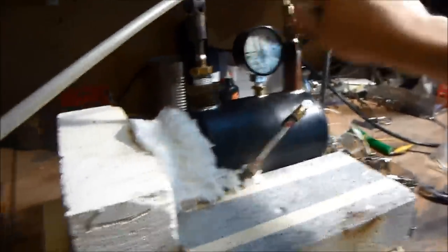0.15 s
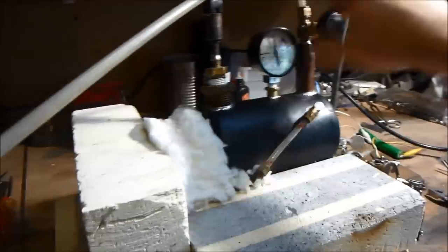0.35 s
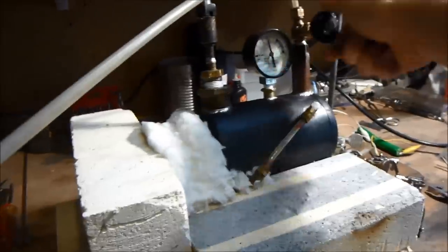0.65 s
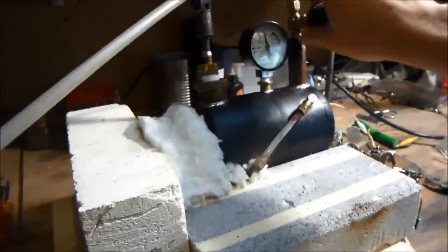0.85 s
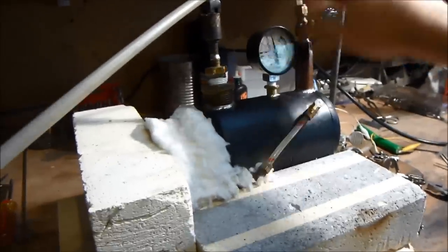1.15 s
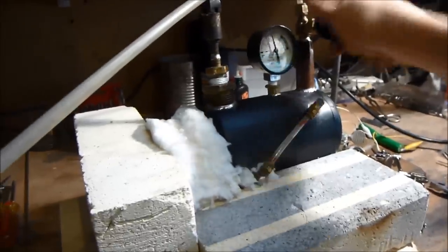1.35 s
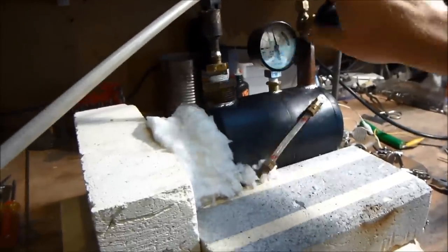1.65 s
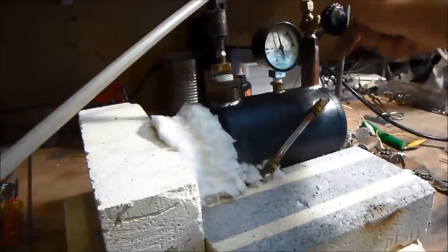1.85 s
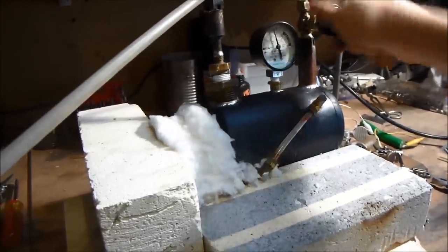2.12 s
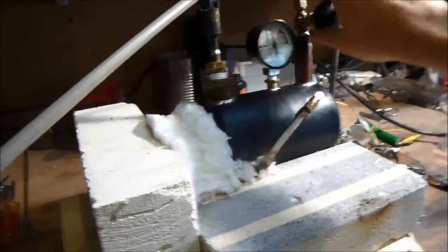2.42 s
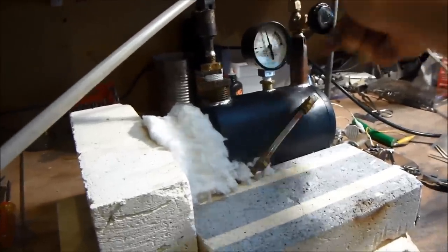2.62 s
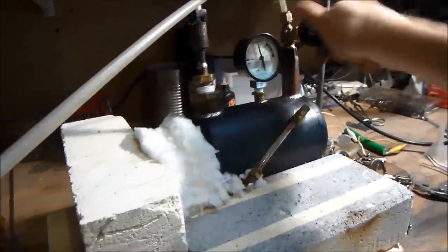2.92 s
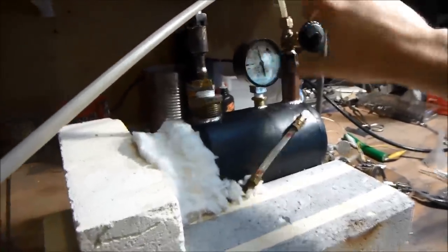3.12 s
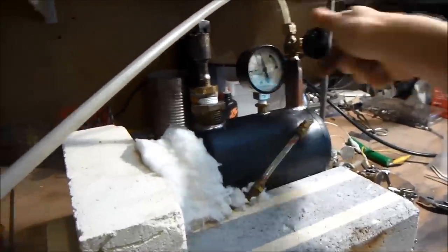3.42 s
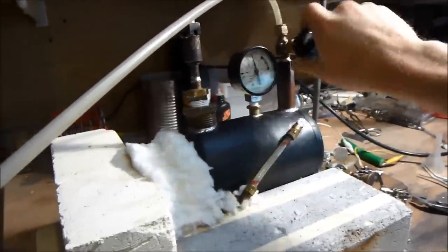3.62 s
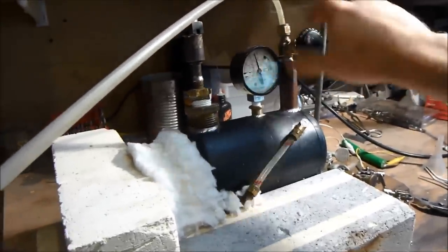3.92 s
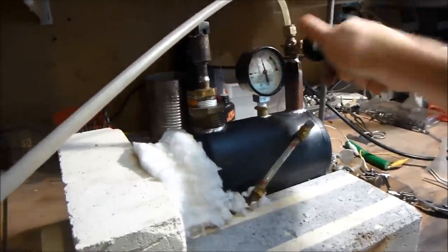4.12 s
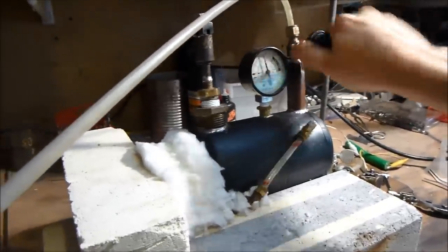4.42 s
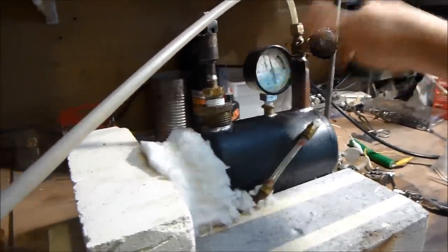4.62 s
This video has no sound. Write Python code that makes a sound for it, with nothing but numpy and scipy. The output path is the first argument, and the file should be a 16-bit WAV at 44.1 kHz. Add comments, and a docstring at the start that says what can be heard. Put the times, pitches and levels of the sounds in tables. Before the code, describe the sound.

Steam from a small boiler hisses through a hand valve and a narrow line, close by in a workshop, from the first moment to the end at nearly 5 seconds. The sound is a steady, slightly fluttering rush topped by a bright sizzle and a thin, very high whistle, with a soft low roar underneath. Now and then a faint ringing tone of the pipework rises out of the hiss, around 0.6, 1.7, 2.4, 3.7 and 4.2 seconds. The rush grows slightly and gradually as the valve is turned open. At about 3 seconds the sizzle shifts a little lower and the whistle sinks slightly; the sizzle briefly returns near 3.7 seconds, then settles lower from about 4 seconds, where the rush is fullest. The hiss sits a little to the left and drifts gently with the hand-held microphone.

```python
"""In a workshop, close by, steam from a small boiler hisses through a hand valve and a narrow line.
A rush rings the pipework, the valve seat sizzles brightly, and a soft low roar sits underneath.
As the valve is slowly turned open the rush grows, and the sizzle, with its thin top whistle,
moves to lower resonances. Each layer is a map of power over time and pitch; their sum shapes
one stereo noise, heard through a gently swaying microphone."""
import sys
import numpy as np
from scipy import signal
from scipy.io import wavfile
from scipy.ndimage import uniform_filter1d

SR = 44100
rng = np.random.default_rng(int(sys.argv[2]) if len(sys.argv) > 2 else 0)


def bounce(signal):
    """Save signal as a 16-bit WAV file at the path given by the first command-line argument."""
    frames = np.transpose(np.atleast_2d(signal))
    limited = np.clip(frames, -1, 1)
    pcm = np.round(limited * 32767).astype(np.int16)
    wavfile.write(sys.argv[1], SR, pcm)


N = 210029
FRAME, HOP = 2048, 256
HZ = np.fft.rfftfreq(FRAME, 1 / SR)
TIMES = np.arange(N // HOP + 3) * HOP / SR

# ride of the sizzle: t/s, level/dB
SIZZLE_LEVEL = [(0, -27.5), (.12, -27.5), (.25, -25.5), (.48, -24), (.6, -25.5), (1.1, -25.5), (1.25, -27),
                (1.5, -25.5), (1.8, -26), (2.45, -25), (2.65, -25), (3.05, -24.5), (3.28, -25), (3.5, -24),
                (3.65, -25.4), (4.76, -25.5)]
# hiss bed of the seat, gap narrow and gap wide: f/Hz, level/dB
SIZZLE_NARROW = [(8500, -33), (10200, -13), (11200, -8), (12000, 0.5), (12500, 2), (12850, -4),
                 (13400, -4.5), (14100, -2.5), (14600, -6), (15100, -16), (15400, -37.5)]
SIZZLE_WIDE = [(8500, -50), (10200, -9.5), (11200, -4), (12000, -7), (12500, -9), (12850, -1), (13400, -5),
               (14100, -6), (14600, -5), (15100, -14), (15600, -13.5)]
# seat resonances, gap narrow and gap wide: f/Hz, width/Hz, level/dB
SEAT_NARROW = [(10600, 169, -6.5), (10972, 61, -4.5), (11275, 35, 0), (11483, 76, 0.0), (11831, 150, 3.0),
               (12158, 40, 7.5), (12249, 77, 4), (12440, 70, 4), (12562, 90, 8.5), (13019, 40, 2),
               (13700, 130, 3.0), (13880, 190, 6), (14120, 60, 0)]
SEAT_WIDE = [(10364, 143, -6), (10713, 146, 1.5), (10974, 99, -2.5), (11194, 93, -.5), (11516, 190, 0),
             (11829, 127, 3), (12092, 133, 3.5), (12309, 74, -0.5), (12557, 101, -1), (13019, 43, 1.5),
             (13321, 65, 5.5), (13631, 103, 3), (13840, 150, 6)]
def sizzle(opening, surge_db):
    """Bright sizzle of the valve seat, crossfading from narrow gap to wide as the valve opens."""
    level_db = along(SIZZLE_LEVEL)[0] + 0.34 * surge_db  # follows the surges less than the pipework
    narrow = colour(SIZZLE_NARROW, SEAT_NARROW, ring_db=-3.5)
    wide = colour(SIZZLE_WIDE, SEAT_WIDE, ring_db=0.5)
    return gain_of(level_db) ** 2 * ((1 - opening) * narrow + opening * wide)


# slow build of the rush: t/s, level/dB
RUSH_LEVEL = [(0, -31), (.25, -29.6), (.65, -30.1), (1.02, -29.5), (1.22, -30), (1.45, -29.5), (1.75, -29),
              (2.2, -28.5), (2.55, -29), (3.05, -28), (3.65, -28.5), (3.85, -28.5), (4.2, -28),
              (4.76, -27.5)]
# turbulence bed in the line: f/Hz, level/dB
RUSH_BED = [(2600, -38), (3100, -11.5), (3600, -4), (4400, -3), (5100, -2), (6000, -3), (6900, -2),
            (7600, -5), (8500, -3), (9500, -4), (11000, -4.5), (14000, -38)]
# resonances of the line: f/Hz, width/Hz, level/dB
LINE_MODES = [(3146, 52, 3), (3343, 67, 5), (3498, 51, 4), (3610, 56, 3.5), (3740, 37, 8), (3897, 41, 5.5),
              (3950, 42, 7), (4020, 22, 8.5), (4180, 64, 4.5), (4280, 35, 2), (4577, 84, 6.5),
              (4755, 44, 5.5), (4844, 59, 6.5), (5130, 45, 2.5), (5270, 60, 0.5), (5490, 56, -3),
              (5650, 67, 1.5), (5830, 74, -3.5), (6170, 88, 0), (6597, 76, 2.5), (6750, 38, 4)]
def rush(tilt_db, surge_db):
    """Body of the hiss: steam rings the narrow line, and a faster jet leans to the treble."""
    brightness_db = tilt_db * np.log2(np.clip(HZ, 2500, 10000) / 4700)
    level_db = along(RUSH_LEVEL)[0] + surge_db + brightness_db
    return gain_of(level_db) ** 2 * colour(RUSH_BED, LINE_MODES, ring_db=1.95)


# glide of the top whistle: t/s, f/Hz, level/dB
WHISTLE_GLIDE = [(0, 13830, -37), (.45, 13850, -33), (.8, 13830, -35), (1.6, 13850, -39),
                 (1.85, 13900, -34), (2.3, 13830, -36), (2.8, 13800, -34), (3.1, 13780, -32),
                 (3.35, 13650, -34), (3.9, 13660, -36.5), (4.25, 13640, -34.5), (4.76, 13630, -34.5)]
def whistle():
    """A thin resonance of the valve seat, sinking in pitch as the gap widens."""
    hz, db = along(WHISTLE_GLIDE)
    peak = bell(hz, width=140)
    return gain_of(db) ** 2 * peak / peak.sum(axis=1, keepdims=True)


# turbulence bed in the throat: f/Hz, level/dB
THROAT_BED = [(1150, -31), (1450, -4), (1600, -19), (1900, -2), (2300, 2.5), (2650, -2), (3000, 2),
              (3500, -29)]
# resonances of the throat: f/Hz, width/Hz, level/dB
THROAT_MODES = [(1565, 59, 1), (1654, 120, 2), (1790, 104, 0.5), (1894, 58, -1), (2002, 23, -2),
                (2071, 33.5, 9.5), (2180, 87, 2), (2400, 110, -0.5), (2607, 77, -0.5)]
def throat(flow_db):
    """Ringing midrange of the jet's throat, riding on the flow."""
    return gain_of(-37 + 1.16 * flow_db) ** 2 * colour(THROAT_BED, THROAT_MODES, ring_db=4.5)


# low turbulence bed: f/Hz, level/dB
ROAR_BED = [(100, -6), (170, -12), (260, -3.5), (370, 2.5), (430, -5), (560, -0.5), (800, -17),
            (1350, -2.5), (1700, -21)]
# resonances of the boiler: f/Hz, width/Hz, level/dB
BOILER_MODES = [(192, 16, -5.5), (278.6, 31, 0.5), (760, 104, -3.5), (922, 45, -3), (1071, 92, -2),
                (1242, 58, -3)]
def roar(flow_db):
    """Soft low roar of turbulence, coloured by the boiler and riding on the flow."""
    return gain_of(-46.5 + 0.97 * flow_db) ** 2 * colour(ROAR_BED, BOILER_MODES, ring_db=4.0)


# pipework accents: t/s, length/s, f/Hz, width/Hz, boost/dB
SWELLS = [(.28, .2, 3500, 600, 3), (.64, 0.091, 3940, 250, 6), (1.7, .22, 3460, 160, 6),
          (2.24, 0.18, 2130, 300, 3), (2.36, 0.22, 4540, 200, 6.5), (3.12, .35, 6700, 500, 3.5),
          (3.66, .22, 3990, 220, 4), (4.24, .18, 2070, 150, 5), (4.68, 0.36, 2340, 1400, 2.3),
          (4.65, .3, 6600, 400, 3)]
def swells():
    """Power gain as now and then a resonance of the pipework sings out of the hiss."""
    boost_db = sum(db * np.exp(-(2 * (TIMES[:, None] - s) / length) ** 2) * bell(hz, width)
                   for s, length, hz, width, db in SWELLS)
    return gain_of(boost_db) ** 2


def surges(slow_hz, fast_hz, count):
    """Flutter of unsteady boiler pressure, rms one: a sum of sines, the slower ones stronger."""
    rates = np.geomspace(slow_hz, fast_hz, count)
    flutter = sum(np.sin(2 * np.pi * (rate * TIMES + rng.random())) / np.sqrt(rate) for rate in rates)
    return evened(flutter)[:, None]


# steam flow, growing as the valve turns: t/s, level/dB
FLOW = [(0, -1.5), (.45, -1.6), (.8, -1.4), (1.05, 0), (1.22, -1.7), (1.55, 0), (1.9, -0.3), (2.15, 1),
        (2.5, -0.1), (3.1, 0.9), (3.85, 0.3), (4.2, 1.7), (4.76, 1.5)]
# the hand on the valve: t/s, opening/0-1, tilt of the rush/dB per octave
VALVE = [(0, 0, 0), (.6, 0, -.2), (1.5, 0.15, 0.5), (2.5, 0.06, 1), (2.9, 0.18, 0.8), (3.15, 0.5, 0.8),
         (3.45, .45, 1), (3.75, 0.1, 0), (4.15, .85, 0), (4.76, .95, 0)]
def jet():
    """Roar, throat, rush and sizzle flutter together; a thin whistle glides on top."""
    surge_db = 0.47 * surges(slow_hz=5, fast_hz=16, count=24)
    flow_db = along(FLOW)[0] + surge_db
    opening, tilt_db = along(VALVE)
    low_roar = roar(flow_db)
    pipework = throat(flow_db) + rush(tilt_db, surge_db)
    return low_roar + pipework * swells() + sizzle(opening, surge_db) + whistle()


# narrow, fixed dips in the tone of the hiss: f/Hz, width/Hz, level/dB
NOTCHES = [(700, 58, -6), (878, 68, -3.5), (1148, 106, -10.5), (1830, 31, -11), (1960, 38, -15),
           (2049, 26, -12), (2510, 85, -10), (2803, 92, -15), (2955, 180, -4.5), (3550, 40, -0.5),
           (12650, 400, -2.5)]
def colour(bed, modes, ring_db):
    """A layer's tone at unit power: resonances swell and fade over turbulence, with fixed notches."""
    hz, width, db = np.transpose(modes)
    chance = rng.standard_normal((len(hz), len(TIMES)))
    drift_db = 0.45 * evened(uniform_filter1d(chance, size=70, axis=1, mode="wrap")).T
    ringing = gain_of(db + ring_db + drift_db) ** 2 @ bell(hz[:, None], width[:, None])
    notch_db = sum(db * bell(hz, width) for hz, width, db in NOTCHES)
    power = (gain_of(across(bed)) ** 2 + ringing) * gain_of(notch_db) ** 2
    return power / power.mean(axis=0).sum()


def workshop(power):
    """Wall echoes add a fine ripple to the treble that drifts as the hand and microphone move."""
    treble = np.clip(HZ / 9500, 0.25, 1)
    ripple_db = 2.8 * treble * patches(frames=300, bins=2)
    eddy_db = 0.4 * patches(frames=14, bins=30)  # short-lived swirls lift one band or another
    return power * gain_of(ripple_db + eddy_db) ** 2


# ride of the jet's bass around 108 Hz: t/s, level/dB
BASS_LEVEL = [(0, 0), (.2, -1), (.3, -10), (.5, 0), (.9, -0.5), (1.22, 4), (1.35, 10), (1.48, 4), (1.7, 3),
              (2.15, 1), (2.33, -2), (2.7, -2), (2.87, -1), (3.2, 0), (3.33, 1), (3.5, -1), (3.68, -0.5),
              (3.9, 3), (4.3, 1.5), (4.76, -1)]
def lumpy_bass(power, cutoff_hz, lump_db):
    """A small jet radiates little bass, and that in lumps."""
    radiated = 1 - 1 / (1 + (HZ / cutoff_hz) ** 12)
    bass_db = along(BASS_LEVEL)[0] + lump_db * patches(frames=18, bins=8)
    return power * radiated * gain_of(bass_db * bell(hz=108, width=280)) ** 2


# room tone: f/Hz, level/dB
RUMBLE_BED = [(20, 1), (45, -8), (70, -36), (200, -32), (1000, -60)]
def rumble(level_db):
    """Faint, steady rumble of the surroundings."""
    power = gain_of(across(RUMBLE_BED)) ** 2
    return gain_of(level_db) ** 2 * power / power.sum()


# likeness of the two microphone ports: f/Hz, coherence/0-1
LIKENESS = [(30, .2), (100, .6), (200, .72), (330, .85), (700, .64), (1300, .48), (1650, .74), (2200, .72),
            (3000, .56), (3900, .68), (5400, .5), (6600, .63), (9200, .55), (11500, .72), (14000, .52)]
# pan by band: f/Hz, left minus right/dB
PAN = [(60, -1.5), (330, 0), (800, -2), (1170, 3.5), (1700, 5), (2700, 6.5), (4200, 6), (5400, 2.5),
       (6600, 2.5), (9000, 1.5), (11000, 1), (12400, 3), (13800, 2.5), (15000, 2)]
# phase between the ports: f/Hz, left lead/rad
PHASE_LEAD = [(50, 0.26), (450, -0.31), (900, 0.51), (1350, 0.85), (1550, 0.61), (2500, 0.37),
              (5000, -0.61), (9000, 0.78), (12800, 0.66), (14200, 0.97), (15500, .1)]
def stereo_noise(power):
    """Noise shaped by the power map, as the two microphone ports hear it."""
    white = rng.standard_normal((2, len(TIMES) * HOP))
    spectra = signal.stft(white, nperseg=FRAME, noverlap=FRAME - HOP)[2]
    shared, separate = spectra[:, :, :len(TIMES)].transpose(0, 2, 1)
    likeness = np.clip(across(LIKENESS), 0, 1)
    pan, lead = gain_of(across(PAN) / 2), across(PHASE_LEAD)
    left = shared * pan
    right = (likeness * shared + np.sqrt(1 - likeness ** 2) * separate) * np.exp(-1j * lead) / pan
    mono_power = (pan ** 2 + pan ** -2 + 2 * likeness * np.cos(lead)) / 4
    pair = np.array([left, right]) * np.sqrt(power * len(HZ) / mono_power)
    return signal.istft(pair.transpose(0, 2, 1), nperseg=FRAME, noverlap=FRAME - HOP)[1][:, :N]


def gain_of(db):
    """Decibels to amplitude."""
    return 10 ** (np.asarray(db) / 20)


def evened(x):
    """Scales to an rms of one."""
    return x / np.sqrt(np.mean(x ** 2) + 1e-20)


def across(points):
    """An EQ-style curve: joins (f/Hz, value) points on a log-frequency axis."""
    hz, value = np.transpose(points)
    return np.interp(np.log(HZ + 1), np.log(hz + 1), value)


def along(rows):
    """Automation curves: each column after t/s, read at the frame times."""
    s, *columns = np.transpose(rows)
    return [np.interp(TIMES, s, column)[:, None] for column in columns]


def bell(hz, width):
    """Power response of one resonance, applied twice for steep skirts."""
    return 1 / (1 + (2 * (HZ - hz) / width) ** 2) ** 2


def patches(frames, bins):
    """Smooth random modulation over time and pitch, rms one."""
    chance = rng.standard_normal((len(TIMES), len(HZ)))
    return evened(uniform_filter1d(uniform_filter1d(chance, frames, axis=0), bins, axis=1))


# pan drift as the hand-held microphone sways: t/s, left minus right/dB
SWAY = [(0, 1), (.35, 0), (.65, 0), (1.2, .5), (1.9, 0.6), (2.2, 0), (3.05, 0), (3.6, 0.4), (4.05, .5),
        (4.76, -.1)]
def scene():
    """The steam jet over the workshop's rumble, shifting a little between the ears."""
    steam = lumpy_bass(workshop(jet()), cutoff_hz=119, lump_db=4.6)
    stereo = stereo_noise(steam + rumble(level_db=-67))
    sway_db = np.interp(np.arange(N) / SR, *np.transpose(SWAY))
    return stereo * gain_of([sway_db / 2, -sway_db / 2])


def record(dry):
    """A steep high cut and a small constant offset."""
    cutoff_hz, dc_offset = 15550, -0.0027
    lowpass = signal.firwin(511, cutoff_hz, window=("kaiser", 9), fs=SR)
    return signal.oaconvolve(dry, lowpass[None], "same", axes=1) + dc_offset


dry = scene()
out = record(dry)
bounce(out)
```